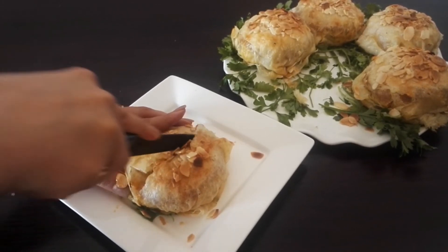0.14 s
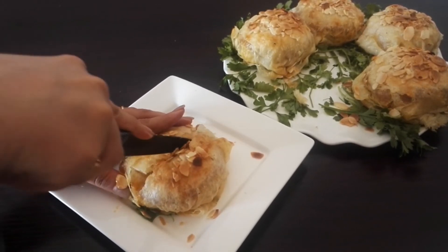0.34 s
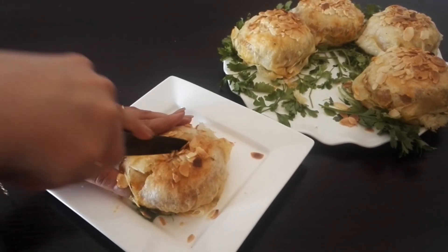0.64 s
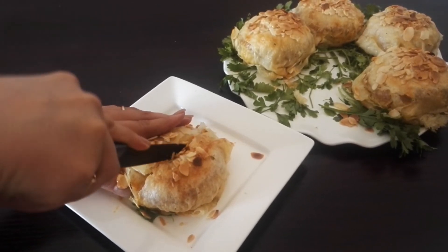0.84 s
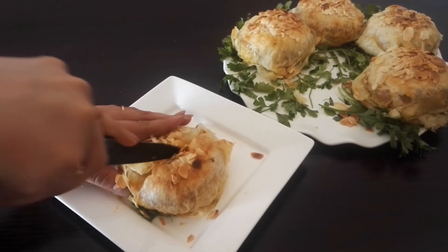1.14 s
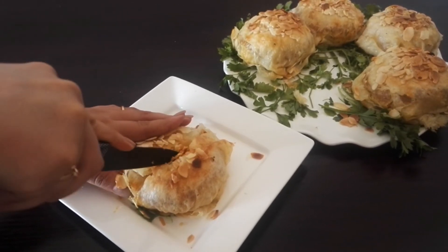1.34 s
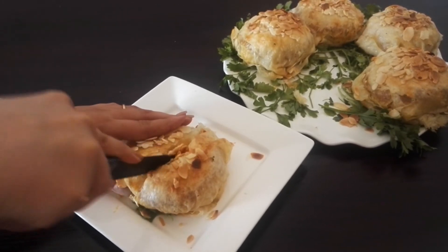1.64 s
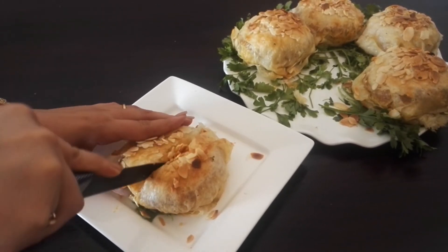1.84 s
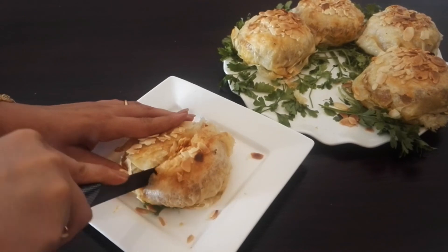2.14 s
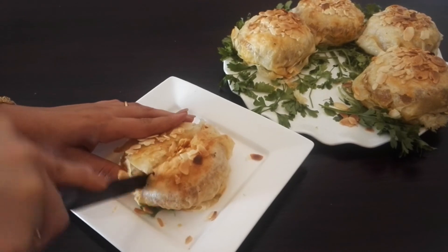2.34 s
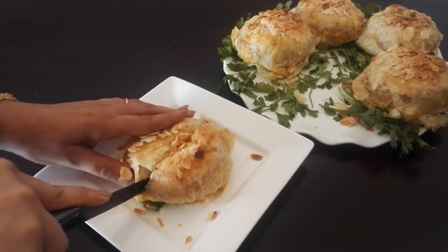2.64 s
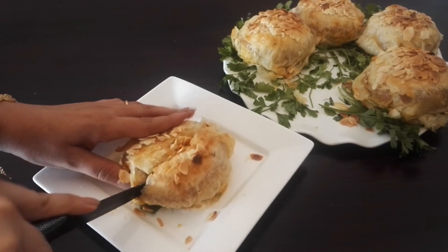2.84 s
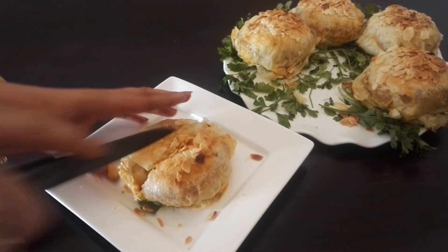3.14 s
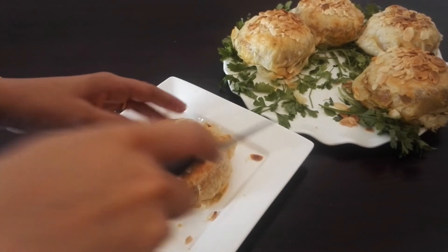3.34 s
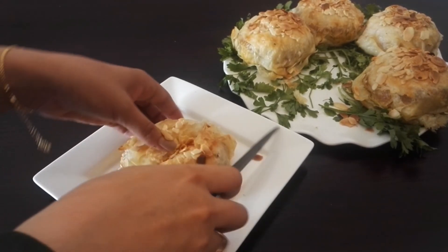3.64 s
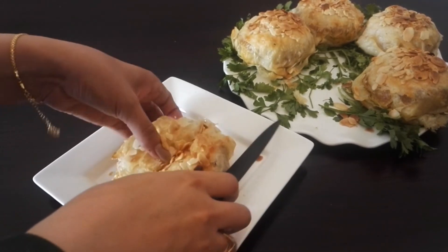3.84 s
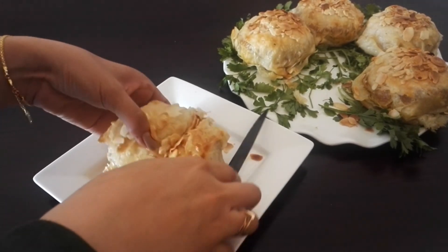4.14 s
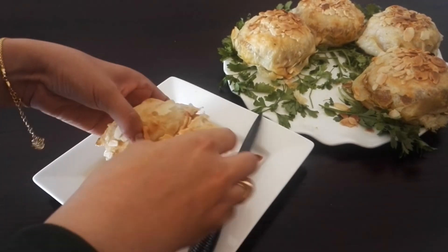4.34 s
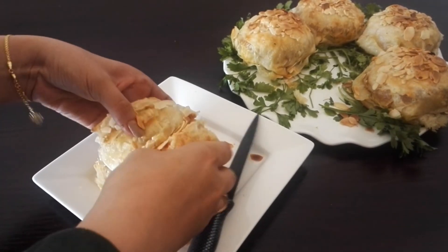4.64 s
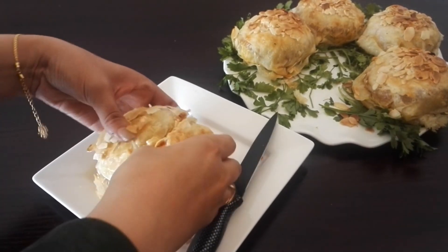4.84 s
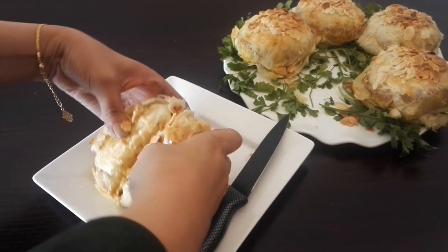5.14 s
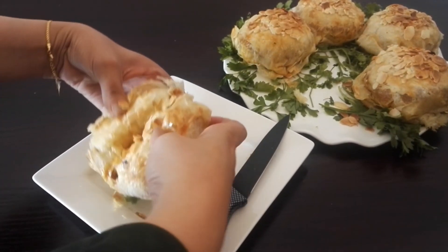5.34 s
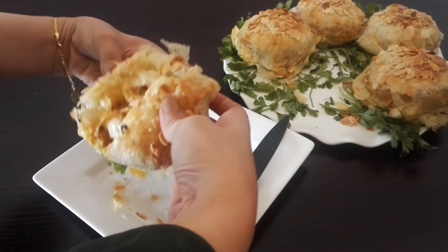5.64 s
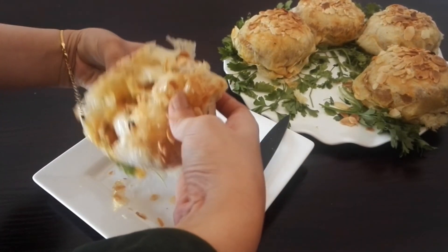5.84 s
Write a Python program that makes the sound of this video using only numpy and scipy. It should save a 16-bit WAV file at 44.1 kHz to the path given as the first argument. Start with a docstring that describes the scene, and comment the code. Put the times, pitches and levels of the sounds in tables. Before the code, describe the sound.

Crisp thin crust breaks under a sawing knife in uneven bursts over faint dull squashing of the filling. After a short pause, steel taps ceramic, and half a second later the handle lands with a hard ringing clack and bounces. Low plate knocks on wood accompany the handling. Finally dry flakes crackle as the pastry is pulled open. Close and detailed, with a small room around it.

```python
"""A quiet room, close to a table: a table knife saws through a flaky pastry on a ceramic plate, heard in stereo.
Bursts of tiny fractures make the crust snap and crackle; slow lumps of filtered noise are the filling.
The knife is laid down with bouncing clinks and rattles, built from the ringing modes of plate and blade.
The plate knocks on the table, a thud with low modes, while fingers pull the pastry apart with more crackling."""
import sys
import numpy as np
from scipy import signal
from scipy.fft import rfft, irfft
from scipy.io import wavfile
from scipy.ndimage import uniform_filter1d

SR = 44100
rng = np.random.default_rng(int(sys.argv[2]) if len(sys.argv) > 2 else 0)


def materialize(psi):
    """Save the field psi as 16-bit PCM at rate SR to the path in sys.argv[1].

    A 1-D psi becomes a single channel; in a 2-D psi each row is a channel.
    """
    bounded = np.clip(np.atleast_2d(psi).T, -1, 1)
    quanta = np.round(bounded * 32767).astype(np.int16)
    wavfile.write(sys.argv[1], SR, quanta)


N = 264600  # 6 s
TIME = np.arange(N) / SR

# Steady room tone. Each row: frequency in Hz, level in dB.
QUIET = [(25, -5), (60, -12.5), (130, 3), (250, 0), (500, -5.5), (1200, -11.5), (4000, -15.5),
         (9000, -21.5), (14000, -18.5), (15500, -47)]
# Room decay. Each row: frequency in Hz, time to fall by 60 dB in seconds.
ROOM = [(100, 0.61), (300, 0.84), (1000, 0.39), (2500, 0.46), (5000, 0.33), (9000, 0.4), (14000, 0.34)]

# Plate and table sway after the firmer pushes. Each row: start in seconds, level in dB, pitch in Hz.
SWAYS = [(.003, -41.5, 282.5), (1.29, -40.5, 115), (1.86, -49, 100.7), (3.257, -38, 268), (3.44, -39, 222),
         (3.99, -47, 106), (4.678, -35, 240.3)]
# The plate rocks on the table. Each row: start in seconds, level in dB, brightness in Hz.
KNOCKS = [(.003, -39, 400), (0.41, -44.5, 307), (1.286, -41.5, 70), (1.859, -48, 222), (3.257, -36.5, 485),
          (3.435, -45, 403), (3.824, -31.5, 500), (4.187, -34, 1560), (4.244, -39.5, 1520),
          (4.351, -46.5, 1020), (4.421, -37, 1529), (4.524, -38.5, 580), (4.671, -32, 870),
          (4.976, -35.5, 1160), (5.053, -40.5, 680), (5.112, -42, 890), (5.157, -44.5, 666)]
# Modes of table and plate together. Each row: frequency in Hz, level in dB, 60 dB decay in seconds.
TABLE_MODES = [(109.7, -10.5, 0.44), (138, -18, 0.075), (186.3, -2.5, 0.35), (217.2, -1.5, 0.33),
               (255, 4.5, 0.056), (266.9, 1, 0.22), (352.4, -7, 0.33), (424, 2, 0.27), (478.6, 2, 0.16),
               (563, -5.5, 0.24), (701, -3, 0.26), (774.4, 7, 0.11)]
# Colour of the thud on the table. Each row: frequency in Hz, level in dB.
THUD = [(30, -16), (70, -21.5), (105, -6.5), (155, -15), (240, 0.5), (450, -10), (900, -10.5), (1500, -10),
        (4000, 0.5)]

# Strokes of the saw. Each row: hardest bite in seconds, half length in seconds, crumbling in dB,
# push on the filling in dB.
STROKES = [(0.233, 0.063, -41.5, -51.5), (0.473, 0.053, -50.5, -89), (0.74, 0.038, -45.5, -51.5),
           (1.25, 0.071, -39.5, -44.5), (1.504, 0.065, -49, -62.5), (1.77, 0.21, -53, -59.5),
           (2.282, 0.27, -49.5, -57.5), (2.806, 0.19, -54.5, -87)]
# Fingers grip and pull the pastry. Each row: hardest pull in seconds, half length in seconds, crumbling in dB.
PULLS = [(3.886, 0.19, -47.5), (4.684, 0.036, -53.5), (5.007, 0.13, -47), (5.308, 0.12, -44),
         (5.474, 0.016, -60), (5.99, 0.03, -42)]
# Colour of the squeezed filling. Each row: frequency in Hz, level in dB.
FILLING = [(25, -4.5), (50, 5.5), (75, -8), (108, 3), (150, -2), (230, -3.5), (450, -7), (800, -14.5),
           (2000, -25.5), (6000, -15), (13000, -28.5), (15000, -67)]

# Knife meets plate. Each row: start in seconds, level in dB, brightness in Hz, place from 0 (blade tip) to
# 1 (handle end), contact time in seconds, lift of the plate's main note in dB, lift of its high modes in dB.
CLINKS = [(3.2096, -41, 5500, .35, 0.00018, -18, -4), (3.4072, -17, 8400, 0.092, 0.00084, -2.5, 2),
          (3.427, -21, 8000, 0.086, 0.00057, -2.5, 6.5), (3.959, -24.5, 2435, 0.31, 0.014, 8, 2),
          (3.9756, -10, 8000, 0.95, 0.00037, -10.5, -8.5), (4.009, -14.5, 17300, 0.62, 0.0012, 0, 7),
          (4.185, -23.5, 20000, 0.58, 0.0084, -6, 18), (4.2454, -33, 11000, 0.65, 0.00029, 3.5, 17),
          (4.256, -44, 15000, 0.45, 0.00077, 1, 7), (4.3531, -43.5, 20000, 0.54, 0.00065, -7.5, 7),
          (4.674, -42.5, 11000, 0.82, 0.0063, -3, 16)]
# Light taps of the knife on the plate. Each row: start in seconds, level in dB, pitch of the blade in Hz.
RATTLES = [(3.827, -47.5, 2330), (3.847, -47, 2160), (3.873, -54, 2270), (3.917, -53, 2180),
           (4.4224, -56, 2060), (4.4635, -58, 2200), (4.954, -52.5, 2140), (4.983, -44.5, 2212),
           (5.04, -50, 2105), (5.0555, -50.5, 2354), (5.16, -50.5, 2236), (5.641, -56.5, 2060),
           (5.956, -57, 2060), (5.986, -57, 2140)]
# Partials of the tapping blade. Each row: ratio to its pitch, level in dB.
BLADE = [(.93, -6), (1, 0), (1.07, -9), (1.551, -14)]
# Ring of plate and knife. Each row: frequency in Hz, 60 dB decay in seconds, level in dB struck by the
# blade tip, level in dB struck by the handle end.
RING = [(684, .4, -21, -14), (1255, .33, -12, -23), (2040, .12, -3, -11), (2078, .15, 0, -2),
        (2132, .2, -7, -1), (2600, .14, -25, -14), (3305, .16, -4, -6), (3365, .15, -1, -4),
        (3437, .29, -3, 1), (3640, .08, -12, -16), (3780, .08, -14, -12), (3890, .16, -22, -11),
        (4586, .13, -15, 3), (4912, .2, -18, -13), (5425, .18, -15, -4), (6174, .25, -14, -8),
        (6422, .15, -19, -5), (6714, .17, -17, -7), (7323, .24, -21, -10), (7967, .2, -23, -11),
        (8455, .18, -17, -13), (8606, .2, -13, -9), (8690, .2, -18, -13), (9028, .2, -21, -6),
        (9630, .2, -9, -8), (9690, .15, -19, -13), (10480, .2, -24, -14), (10580, .15, -24, -14),
        (11128, .16, -21, -5), (11283, .19, -22, -8), (11470, .17, -21, -12), (11714, .14, -16, -11),
        (11810, .12, -21, -8), (12273, .2, -20, -11), (12472, .14, -17, -4), (13440, .13, -17, -10),
        (13560, .12, -15, -9), (13845, .14, -20, -6), (13990, .1, -27, -11)]
# How well the plate radiates. Each row: frequency in Hz, level in dB.
RADIATION = [(700, 3.5), (2100, 10.5), (3400, 1), (4600, 6.5), (7000, 7), (9500, 8.5), (13500, 5)]
# Colour of the short clack of steel on ceramic. Each row: frequency in Hz, level in dB.
CLACK = [(50, -41.5), (200, -15), (700, -27.5), (1600, -3.5), (2150, 1.5), (2850, -5.5), (3400, 4.5),
         (4000, -31), (4700, -4.5), (9000, -26.5), (13800, -29.5), (15000, -39)]

# Blade or finger tears through layers of crust. Each row: start in seconds, level in dB, length in seconds.
RASPS = [(0.19, -36.5, 0.034), (0.853, -30.5, 0.0065), (1.231, -42.5, 0.057), (1.3006, -24, 0.0021),
         (1.856, -52, 0.048), (2.364, -31.5, 0.0052), (2.394, -45.5, 0.032), (5.234, -37.5, 0.011),
         (5.464, -56, 0.0094), (5.602, -49, 0.0095)]
# Colour of the tearing layers. Each row: frequency in Hz, level in dB.
RASP = [(100, -21), (400, 3), (1200, 4), (2800, 3), (4500, -9.5), (9000, 2.5), (15000, -29)]
# Colour of the crackling crumbs. Each row: frequency in Hz, level in dB.
CRUMBS = [(300, -34.5), (1500, -1.5), (3000, 0.5), (4500, 0.5), (7000, 1), (9500, 5), (14000, 6),
          (15200, -44)]
# Larger flakes that snap. Each row: start in seconds, level in dB, deep part over bright part in dB,
# pitch of the flake in Hz.
SNAPS = [(.162, -24, -15.5, 11800), (.1834, -40.5, -24, 10900), (.2638, -32.5, -11, 8300),
         (0.342, -22.5, -10.5, 12800), (0.3512, -21, -23, 12400), (.444, -35, -31, 9550),
         (0.5255, -28.5, -31, 9200), (.651, -29, -30, 8900), (0.6728, -32, -17, 9000),
         (0.687, -30, -20, 8810), (0.732, -29, -23, 13700), (0.8538, -17, -12.5, 9000),
         (1.224, -30, -28, 12700), (1.2333, -19, -27, 10400), (1.2722, -22.5, -16, 10100),
         (1.2988, -16, -13, 12500), (1.7778, -39.5, -22, 5520), (1.8374, -33.5, -16, 6000),
         (2.1925, -34, -8, 6360), (2.206, -27, -16, 6500), (2.2389, -24.5, -19, 12700),
         (2.247, -29, -6, 11600), (2.264, -18.5, -6.5, 6300), (2.2723, -16.5, -14, 5940),
         (2.3045, -29, -21, 10900), (2.3179, -14, -10.5, 11800), (2.355, -13.5, -9, 10700),
         (2.367, -11.5, -13, 10200), (2.441, -16.5, -2.5, 10300), (2.467, -23, -19, 6200),
         (2.5864, -32.5, -11, 9900), (2.593, -20.5, -3.5, 9900), (2.6754, -23.5, -34, 13500),
         (2.7042, -18, -5.5, 4900), (2.7232, -24.5, 1.5, 9650), (3.571, -29.5, -9, 5900),
         (3.9104, -22.5, -27, 13000), (3.932, -32, -14, 13100), (4.413, -26, -14, 9300),
         (4.6175, -28, -12.5, 12200), (4.759, -34, -27, 13200), (4.8155, -29.5, -25, 12300),
         (4.8174, -20, -24, 11300), (4.8556, -23, -17, 13200), (4.9362, -27.5, -13, 10000),
         (5.1248, -28, -29, 13300), (5.1334, -28, -19, 11200), (5.1885, -24.5, -26, 9700),
         (5.212, -33.5, -25, 12000), (5.2375, -25.5, -1, 4530), (5.261, -27.5, -14, 11000),
         (5.3315, -20.5, -10.5, 9100), (5.355, -25, -12, 9300), (5.403, -29.5, -9, 9470),
         (5.4686, -22.5, -7, 9000), (5.479, -25.5, -30, 10500), (5.608, -30, -1, 4840),
         (5.6239, -25.5, -28, 10950), (5.656, -18.5, -21, 9100), (5.6968, -34.5, -4.5, 4700),
         (5.816, -31.5, -17, 12700), (5.915, -32, -4.5, 9300), (5.9777, -26, -10.5, 7360)]
# Deep part of a snapping flake. Each row: frequency in Hz, level in dB per Hz.
FLAKE_LOW = [(100, -26.5), (600, -14.5), (1600, -15.5), (2500, 5.5), (3100, 7), (3600, 6.5), (4300, 10),
             (6000, -0.5), (12000, -69)]
# Bright part of a snapping flake. Each row: frequency in Hz, level in dB per Hz.
FLAKE_HIGH = [(1500, -32), (4000, -9.5), (5500, -9), (7000, -2.5), (10500, -1), (13000, 3.5), (14800, -5),
              (16000, -27)]

EDGE_HZ = 15900  # upper band limit
REBOUND_S, REBOUND_DB = 0.03, -4.5  # the plate falls back once after each knock
# A clink also pushes the plate on the table; the handle is heavier.
TIP_THUD_DB, HANDLE_THUD_DB, THUD_HZ = -11.5, -11, 1260
RISE_SHARE = 0.78  # a stroke or pull builds up faster than it lets go
REST_CRUMBLE_DB, REST_PUSH_DB = -61, -60  # floor under the strokes
FILLING_LAG_S = 0.029  # the blade is through the crust before it presses on the filling
SAWING_ENDS_S = 2.95
MAIN_NOTE_HZ, MAIN_NOTE_WIDTH_HZ = 2080, 500
HIGH_MODES_HZ = 6500
PORT_TURN = .6  # radians by which a plate mode reaches one microphone early and the other late
KNOCK_RING_DB, KNOCK_RING_HZ = -20, 5500  # a knock also sets the plate ringing faintly
CLACK_DECAY_S = .011
CLUMP_DB, CLUMP_HZ = 5, 22  # depth and speed of the uneven crumbling
CLUSTER_DB, CLUSTER_S = -23, 0.0032  # smaller flakes give way just before and after each snap
AFTERMATH_S = 0.0037  # decay of the cluster after the snap
BREAK_DOUBLES_DB = 20  # a flake this much louder takes twice as long to break


def amp(db):
    """Decibels to gain."""
    return 10 ** (np.asarray(db) / 20)


def unit(x):
    """Scales to rms 1."""
    return x / np.sqrt(np.mean(x ** 2) + 1e-20)


def burst(x, seconds):
    """Scales a short sound to the energy that rms 1 has in that many seconds."""
    return x * np.sqrt(seconds * SR / (np.sum(x ** 2, -1, keepdims=True) + 1e-20))


def read(points, hz):
    """Reads a table on a log-frequency axis."""
    f, value = np.transpose(points)
    return np.interp(np.log(hz + 1), np.log(f + 1), value)


def add(mix, s, sound):
    """Mixes a sound in at time s."""
    part = mix[:, max(round(s * SR), 0):][:, :sound.shape[-1]]
    part += sound[..., :part.shape[1]]


def convolve(x, response):
    """Convolves along time, keeping the length of x."""
    return signal.fftconvolve(np.atleast_2d(x), np.atleast_2d(response), axes=1)[:, :x.shape[-1]]


def colour(x, points, size=4096):
    """Causal (minimum-phase) filter of unit energy with the given spectrum."""
    log_gain = np.log(amp(read(points, abs(np.fft.fftfreq(size, 1 / SR)))))
    taps = np.fft.ifft(np.exp(np.conj(signal.hilbert(log_gain)))).real[:size // 2]
    return convolve(x, taps / np.linalg.norm(taps))


def soften(hz, corner_hz):
    """A softer contact excites less above its corner frequency."""
    return 1 / np.sqrt(1 + (hz / corner_hz) ** 4)


def lowpass(x, corner_hz):
    """Applies the softening curve to a sound."""
    count = x.shape[-1]
    return irfft(rfft(x) * soften(np.fft.rfftfreq(count, 1 / SR), corner_hz), count)


def resonance(x, hz, q):
    """The part of a sound that one resonance picks out."""
    return signal.lfilter(*signal.iirpeak(hz, q, SR), x)


def pair(count, alike):
    """Noise for two microphones with a given likeness."""
    a, b = rng.standard_normal((2, count))
    alike = np.clip(alike, 0, 1)
    return np.array([a, alike * a + np.sqrt(1 - alike ** 2) * b])


def pan(db):
    """Gains of left and right."""
    return amp([[db / 2], [-db / 2]])


def tones(hz, size, t, port_turn):
    """Sums partials; each reaches one microphone a little ahead of the other."""
    lead = port_turn * rng.choice([-1, 1], hz.shape) * np.array([1, -1])[:, None, None]
    phase = rng.uniform(0, 2 * np.pi, hz.shape)
    return (size * np.sin(2 * np.pi * hz * t + phase + lead)).sum(1)


def fracture(t, rise, flat=0.86):
    """A brief burst of tiny breaks, with only mild ripple in its spectrum."""
    spectrum = rfft(pair(len(t), 0.29) * t / rise * np.exp(1 - t / rise))
    flattened = spectrum / (abs(spectrum) + 1e-9) ** min(flat, 1)
    return burst(irfft(flattened, len(t)), 1 / 1000)


def swell(s, length):
    """The effort of one stroke or pull: a bell that peaks at time s."""
    return np.exp(-((TIME - s) / (length * np.where(TIME < s, RISE_SHARE, 1))) ** 2)


def quiet_room():
    """Steady, softly coloured noise, largely alike at both microphones."""
    return unit(colour(pair(N, 0.75), QUIET))


def room(x, gap=0.00081, top_hz=14000):
    """Early echoes come in bunches, then a dense tail decays by frequency; the bass is alike at both microphones."""
    hz, t, z = signal.stft(rng.standard_normal((2, SR * 2 // 3)), SR, nperseg=256)
    same = soften(hz, 290)[:, None]
    z[1] = same * z[0] + np.sqrt(1 - same ** 2) * z[1]
    top = np.clip((top_hz - hz) / 700 + 1, 0, 1)[:, None]
    decay = amp(-60 * t / read(ROOM, hz)[:, None])
    tail = signal.istft(z * top * decay, SR, nperseg=256)[1]
    age = np.arange(tail.shape[1]) / SR
    bunches = unit(uniform_filter1d(rng.standard_normal(len(age)), 60))
    bunching_db = 5 * np.exp(-age / .08) * bunches
    tail *= np.clip(age / gap - 1 / 2, 0, 1) * amp(bunching_db)
    return convolve(x, tail / np.linalg.norm(tail[0]))


def boom(x, hz=103, width_hz=12, db=0.0):
    """One low resonance of the table swells under every push and knock."""
    return x + amp(db) * resonance(x, hz, hz / width_hz)


def sways(build=0.014, sag=0.018):
    """After a firm push, plate and table swing at one low note that swells, sinks a little and dies."""
    out = np.zeros((2, N))
    t = np.arange(SR // 3) / SR
    for s, db, hz in SWAYS:
        turns = np.cumsum(hz * (1 + sag * np.exp(-t / build))) / SR + rng.random()
        envelope = t / build * np.exp(1 - t / build)
        add(out, s, amp(db) * envelope * np.sin(2 * np.pi * turns))
    return out


def knock(bright_hz, mode_db=-3.5, thud_db=-3.0, thud_decay=0.012):
    """The plate meets the wooden table: a thud and the low modes of the top."""
    t = np.arange(SR // 2) / SR
    hz, db, t60 = np.transpose(TABLE_MODES)[:, :, None]
    detune = 1 + 0.0095 * rng.standard_normal(hz.shape)  # the hands load the plate differently each time
    size = amp(db - 60 * t / t60) * soften(hz, bright_hz) * rng.choice([-1, 1], hz.shape)
    modes = (size * np.sin(2 * np.pi * hz * detune * t)).sum(0)
    thud = lowpass(colour(pair(len(t), 1.0), THUD), bright_hz) * np.exp(-t / thud_decay)
    return amp(mode_db) * burst(modes, 0.0093) + amp(thud_db) * burst(thud, 0.012)


def knocks(rebound_duller=0.96):
    """The plate rocks and falls back under the hands, and thuds under each blow of the knife."""
    out = np.zeros((2, N))
    for s, db, bright_hz in KNOCKS:
        add(out, s, amp(db) * knock(bright_hz))
        add(out, s + REBOUND_S, amp(db + REBOUND_DB) * knock(rebound_duller * bright_hz))
    for s, db, _, place, *_ in CLINKS:
        thud_db = TIP_THUD_DB + place * (HANDLE_THUD_DB - TIP_THUD_DB)
        add(out, s, amp(db + thud_db) * knock(THUD_HZ))
    return out


def filling(db=-2, lump_db=4.5, lump_hz=14):
    """Late in every stroke the soft inside gives way in dull, uneven lumps that pass into the table."""
    cutting = np.clip((SAWING_ENDS_S - TIME) / 0.013, 0, 1)
    strokes = sum(amp(push_db) * swell(s + FILLING_LAG_S, length) for s, length, _, push_db in STROKES)
    push = amp(REST_PUSH_DB) * cutting + strokes
    lumps = unit(lowpass(rng.standard_normal(N), lump_hz))
    slips = unit(amp(lump_db * np.clip(lumps, -2, 2)) * colour(pair(N, 1.0), FILLING))
    return amp(db) * push * slips


def plate_ring(place, bright_hz, note_db, high_db, t, damp=0.025, lasting=0.32, shift=0.0012):
    """The modes for one place of contact; the knife, lying against the plate, soaks up the first of the ring."""
    hz, t60, tip_db, handle_db = np.transpose(RING)[:, :, None]
    place_db = tip_db + place * (handle_db - tip_db)
    main_note_db = note_db * np.exp(-((hz - MAIN_NOTE_HZ) / MAIN_NOTE_WIDTH_HZ) ** 2)
    high_modes_db = high_db * (1 - soften(hz, HIGH_MODES_HZ))
    db = place_db + main_note_db + high_modes_db + read(RADIATION, hz)
    size = amp(db - 60 * t / t60) * soften(hz, bright_hz)
    hz = hz * (1 + shift * rng.standard_normal(hz.shape))  # each contact loads the modes differently
    return tones(hz, size, t, PORT_TURN) * (lasting + np.exp(-t / damp))


def clink(bright_hz, place, contact, note_db, high_db, ring_db=-1, clack_db=-5, tick_db=-4, tick_rise=.0003):
    """Steel strikes ceramic: a sharp tick and a short clack, then plate and knife ring at nearly fixed pitches."""
    t = np.arange(SR // 2) / SR
    hz = np.fft.rfftfreq(len(t), 1 / SR)
    fade = np.exp(-t / CLACK_DECAY_S)
    clack_spectrum = rfft(pair(len(t), 0.2)) * amp(read(CLACK, hz)) * soften(hz, bright_hz)
    clack = burst(irfft(clack_spectrum, len(t)) * fade, 0.0066)
    ring = burst(plate_ring(place, bright_hz, note_db, high_db, t), 0.031)
    tick = fracture(t, tick_rise) * fade
    blow = amp(ring_db) * ring + amp(clack_db) * clack + amp(tick_db) * tick
    return blow * (1 - np.exp(-t / contact))


def rattle(pitch_hz, t60=0.079, contact=0.0007, plate_db=-6, plate_hz=5500):
    """A light tap: the blade sounds briefly, at a pitch set by where it rests, and barely wakes the plate."""
    t = np.arange(SR // 6) / SR
    ratio, db = np.transpose(BLADE)[:, :, None]
    blade = burst(tones(pitch_hz * ratio, amp(db - 60 * t / t60), t, 0.76), 0.048)
    plate = burst(plate_ring(0.28, plate_hz, -3.0, 0, t), 0.076)
    return (blade + amp(plate_db) * plate) * (1 - np.exp(-t / contact))


def clinks():
    """The knife is laid down and bounces, then rocks and taps; knocks after the first clink ring the plate."""
    out = np.zeros((2, N))
    for s, db, *blow in CLINKS:
        add(out, s, amp(db) * clink(*blow))
    for s, db, pitch_hz in RATTLES:
        add(out, s, amp(db) * rattle(pitch_hz))
    t = np.arange(SR // 3) / SR
    for s, db, _ in KNOCKS:
        if s > CLINKS[0][0]:
            ring = burst(plate_ring(.5, KNOCK_RING_HZ, -1.5, 0, t), 0.04)
            add(out, s, amp(db + KNOCK_RING_DB) * ring)
    return out


def clumps():
    """Crust gives way in fits and starts, with lulls between."""
    drift = unit(lowpass(rng.standard_normal(N), CLUMP_HZ))
    return unit(amp(CLUMP_DB * np.clip(drift, -2, 1.2)))


def grains(per_second, spread_db, rise, pitch_db=7):
    """A stream of tiny fractures in ten pitches: most are faint, a few stand out."""
    size = amp(spread_db * np.minimum(rng.exponential(1, N), 4)) * rng.choice([-1, 1], N)
    clicks = size * (rng.random(N) < per_second / SR)
    kind = rng.integers(0, 10, N)
    age = np.maximum(np.arange(SR // 200) - SR // 1000, 0) / SR
    out = 0
    for k, hz in enumerate(np.linspace(3000, 13000, 10)):
        crack = fracture(age, rise)
        pitched = crack + amp(pitch_db) * resonance(crack, hz, q=5)
        out = out + convolve(clicks * (kind == k), pitched)
    return unit(out)


def crumbling(crumb_db=-3, rasp_db=0):
    """Crumbs crackle with every stroke and pull and cluster round each snap; tearing layers crowd into a rasp."""
    drag = np.zeros(N)
    for s, db, length in RASPS:
        age = np.maximum(TIME - s, 0)
        drag += amp(db) * (1 - np.exp(-age / 0.00046)) * np.exp(-(age / length) ** 2)
    moves = sum(amp(db) * swell(s, length) for s, length, db, *_ in STROKES + PULLS)
    effort = amp(REST_CRUMBLE_DB) + moves
    strain = np.zeros((1, N))
    t = np.arange(-SR // 50, SR // 10) / SR
    for s, db, *_ in SNAPS:
        add(strain, s + t[0], amp(db) * np.exp(np.minimum(t / CLUSTER_S, -t / AFTERMATH_S)))
    crumbs = effort * clumps() * colour(grains(per_second=700, spread_db=2.5, rise=0.00023), CRUMBS)
    cluster = strain * colour(grains(per_second=180, spread_db=5.5, rise=0.00018), CRUMBS)
    rasp = drag * np.sqrt(clumps()) * colour(grains(per_second=1600, spread_db=3.0, rise=0.000547), RASP)
    return amp(crumb_db) * crumbs + amp(CLUSTER_DB) * cluster + amp(rasp_db) * rasp


def snaps(bright_db=0, deep_db=0, pitch_db=4, pitch_width_hz=1500, rise=0.00035, quiver=0.0063,
          quiver_db=-10, strain=0.00053, scatter_db=2.0):
    """Each flake creaks, breaks sharply and quivers at a pitch of its own; thick flakes add a deep crunch."""
    out = np.zeros((2, N))
    t = np.arange(SR // 40) / SR
    lead = 2 / 1000  # seconds of creaking before the break
    age = np.maximum(t - lead, 0)
    usual_db = np.mean([row[1] for row in SNAPS])
    for s, db, thick_db, hz in SNAPS:
        slow = 2 ** ((db - usual_db) / BREAK_DOUBLES_DB)
        creak_and_quiver = np.exp(np.minimum((t - lead) / strain, -age / quiver))
        splinters = burst(pair(len(t), .4) * creak_and_quiver, 1 / 1000)
        crack = fracture(age, rise * slow) + amp(quiver_db) * splinters
        bright = colour(crack, FLAKE_HIGH)
        bright = bright + amp(pitch_db) * resonance(bright, hz, hz / pitch_width_hz)
        side = pan(scatter_db * rng.standard_normal())
        deep = burst(colour(crack, FLAKE_LOW), 1 / 1000)
        flake = amp(bright_db) * side * burst(bright, 1 / 1000) + amp(deep_db + thick_db) * deep
        add(out, s - lead, amp(db) * flake)
    return out


def scene(crust_room_db=-6, clink_room_db=-9, table_room_db=-6, quiet_db=-63.0):
    """Crust, plate and table in the room; the pastry is a little nearer to the left microphone."""
    crust = snaps() + crumbling()
    plate = pan(0.84) * clinks()
    table = boom(knocks() + sways() + filling())
    near = crust + table
    near[1] = np.pad(near[1], (5, 0))[:N]  # five samples later on the right
    spread = lowpass(crust, 11000)  # the highest treble beams upward and hardly fills the room
    radiated = amp(crust_room_db) * spread + amp(clink_room_db) * plate + amp(table_room_db) * table
    return near + plate + room(radiated) + amp(quiet_db) * quiet_room()


def record(dry):
    """The input clips at full scale; then the band limit."""
    band_limit = signal.firwin(255, EDGE_HZ, window=("kaiser", 8), fs=SR)
    return signal.oaconvolve(np.clip(dry, -1, 1), band_limit[None], "same")


dry = scene()
out = record(dry)
materialize(out)
```